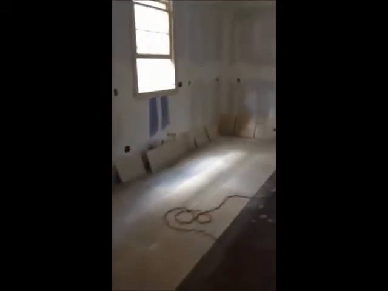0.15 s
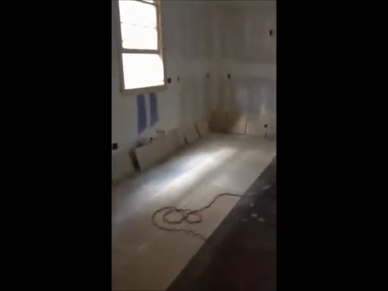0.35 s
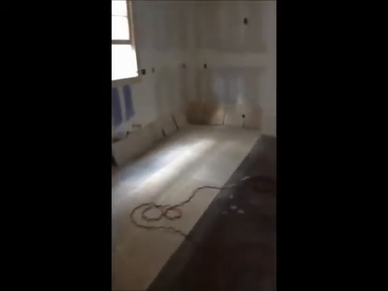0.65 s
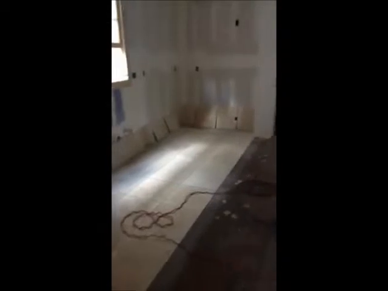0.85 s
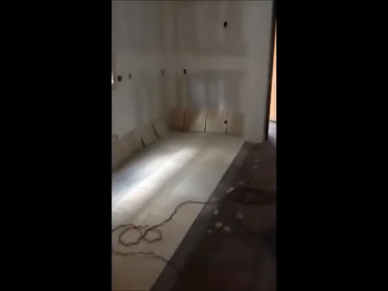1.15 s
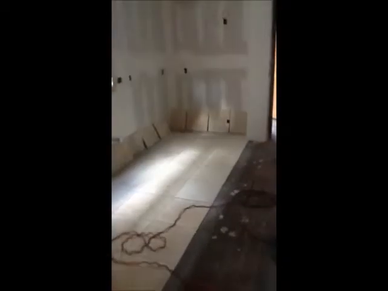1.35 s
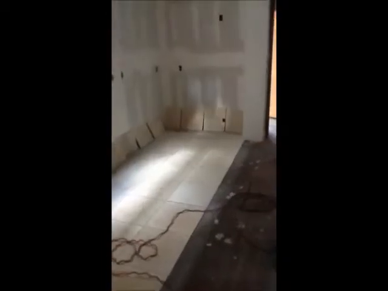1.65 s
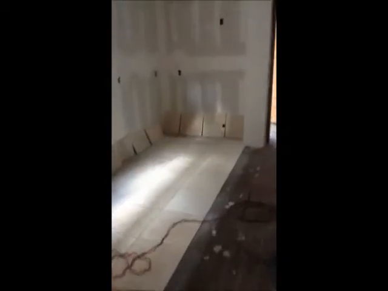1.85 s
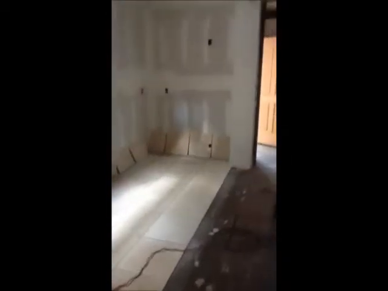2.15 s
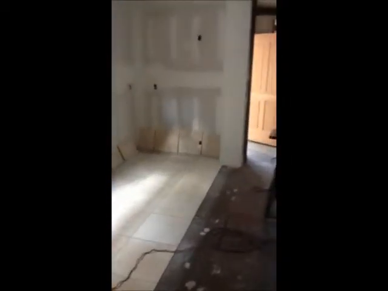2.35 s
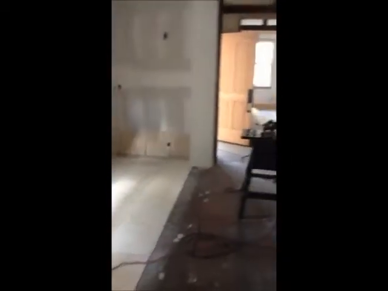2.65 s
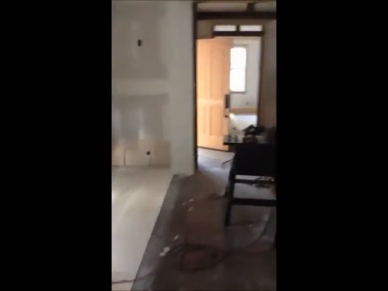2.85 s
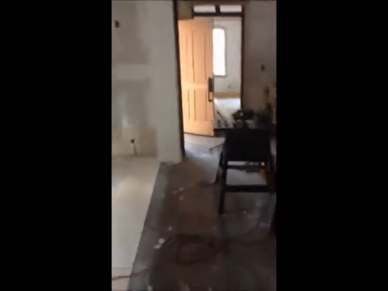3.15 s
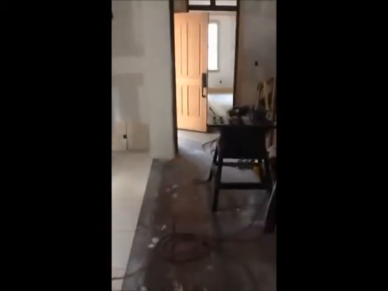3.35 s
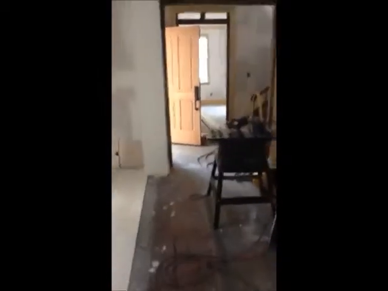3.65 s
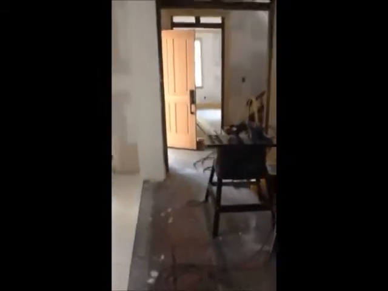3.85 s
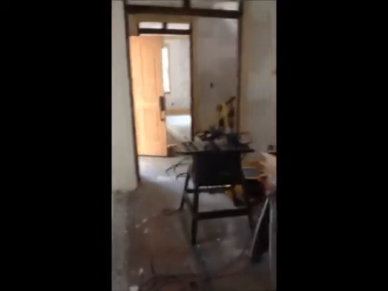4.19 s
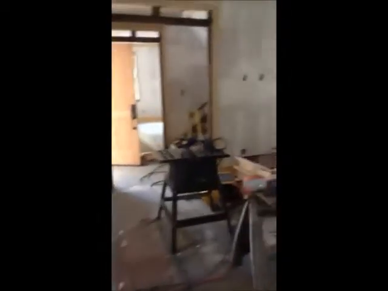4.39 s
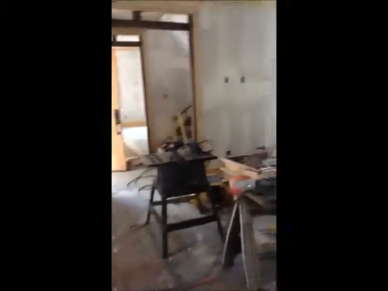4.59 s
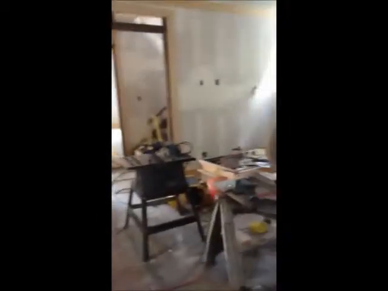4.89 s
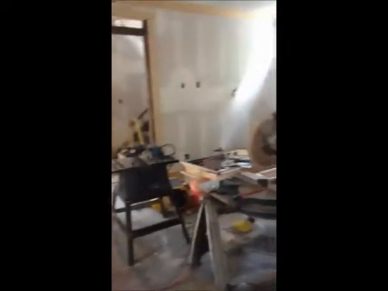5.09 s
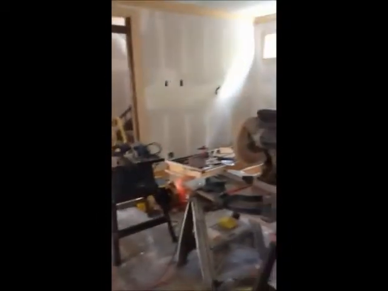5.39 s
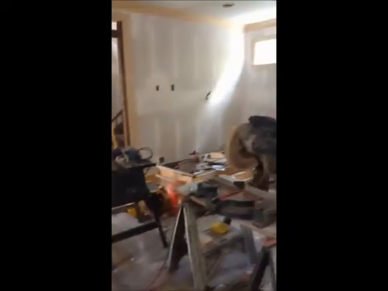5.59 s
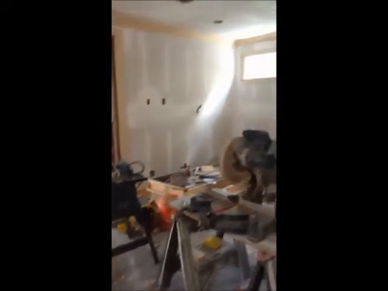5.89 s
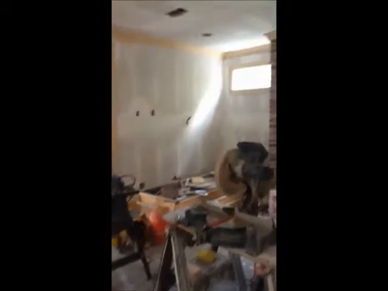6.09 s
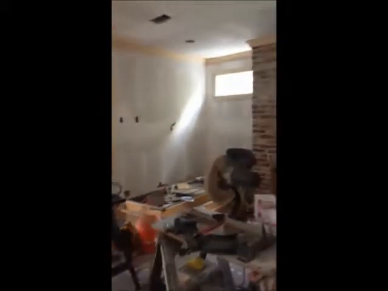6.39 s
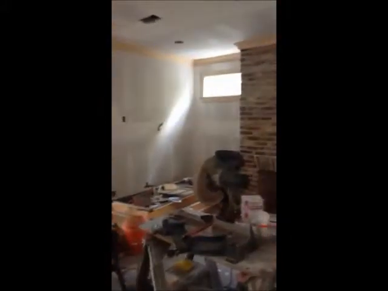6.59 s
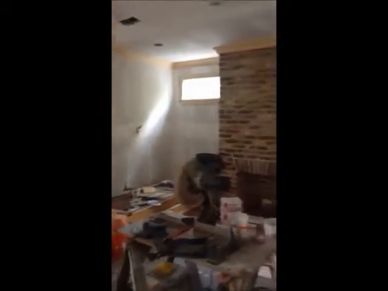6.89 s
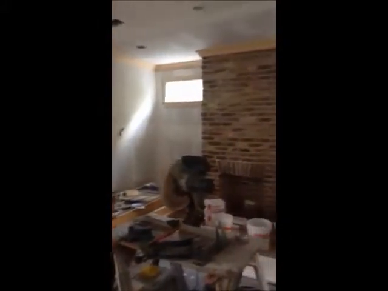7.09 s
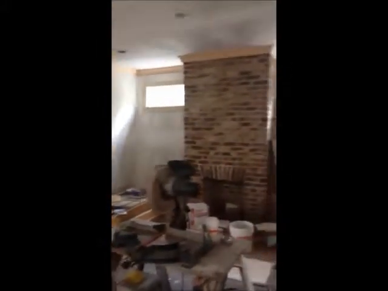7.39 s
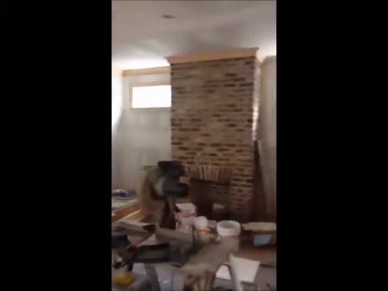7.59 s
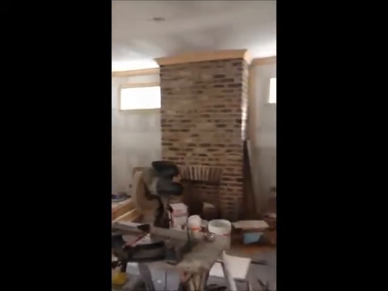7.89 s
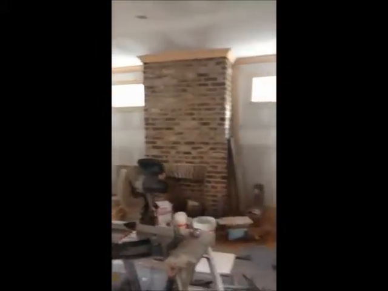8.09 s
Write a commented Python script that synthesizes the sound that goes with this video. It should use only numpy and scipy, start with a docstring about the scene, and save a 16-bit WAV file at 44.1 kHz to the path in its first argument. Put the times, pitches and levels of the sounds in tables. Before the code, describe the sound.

A saw blade hisses down to a stop while heavy hammer blows hit timber, then a nail gun cracks and boards creak and scrape in a bare room.

```python
"""Hammer and saw in a bare room

A saw blade coasts down: fading filtered noise and blade resonances, with two thin squeaks of rubbing.
Heavy blows and lighter knocks shake timber (noise bursts) and ring boards (sines); some rumble the joists.
A nail gun cracks once in three noise bursts; steel rings as decaying sines and nails as narrow resonances.
Random slips creak a board, and noise strokes scrape a gritty floor. Low house noise and echoes lie behind."""
import sys
import numpy as np
from scipy import signal
from scipy.fft import rfft, irfft, next_fast_len
from scipy.io import wavfile
from scipy.ndimage import map_coordinates

SR = 44100
rng = np.random.default_rng(int(sys.argv[2]) if len(sys.argv) > 2 else 0)


def dump(signal):
    """Clip the signal to [-1, 1] and save it as 16-bit WAV at the path in sys.argv[1]."""
    limited = np.clip(np.atleast_2d(signal).T, -1, 1)
    pcm = np.round(limited * 32767).astype(np.int16)
    wavfile.write(sys.argv[1], SR, pcm)


N = 363384
T = np.arange(SR) / SR  # seconds within one event, which lasts at most 1 s


def amp(db):
    """Decibels to gain."""
    return 10 ** (np.asarray(db) / 20)


def unit(x):
    """Scale to rms 1."""
    return x / np.sqrt(np.mean(x ** 2) + 1e-20)


def unit_onset(x):
    """Scale to rms 1 over the first 50 ms."""
    return x / np.sqrt(np.mean(x[:SR // 20] ** 2) + 1e-20)


def along(points, hz):
    """Read (pitch_hz, value) points on a log frequency axis."""
    point_hz, value = np.transpose(points)
    return np.interp(np.log(hz + 1), np.log(point_hz + 1), value)


def wobble(rate, size=N):
    """A smooth random curve with this many knots a second."""
    knots = rng.standard_normal(int(size * rate / SR) + 4)
    return map_coordinates(knots, [np.arange(size) * rate / SR])


def filtered(x, response):
    """Multiply the spectrum of x by a response of frequency."""
    m = next_fast_len(len(x) + 8192)  # padding leaves room for the filter's tail
    return irfft(rfft(x, m) * response(np.fft.rfftfreq(m, 1 / SR)), m)[:len(x)]


def coloured(x, db_of_hz, size=4096):
    """Give x this dB curve through a minimum-phase filter, so attacks stay sharp."""
    cepstrum = irfft(np.log(amp(db_of_hz(np.fft.rfftfreq(size, 1 / SR)))))
    # folding the cepstrum onto positive time makes the filter causal
    cepstrum[1:size // 2] *= 2
    cepstrum[size // 2 + 1:] = 0
    impulse = irfft(np.exp(rfft(cepstrum)))
    return signal.fftconvolve(x, impulse)[:len(x)]


def resonate(x, modes):
    """Pass x through parallel band-pass resonances (pitch_hz, width_hz, gain_db)."""
    def response(f):
        return sum(amp(db) * 1j * f * width / (hz * hz - f * f + 1j * f * width) for hz, width, db in modes)
    return filtered(x, response)


def noise(colour):
    """Steady noise of rms 1 with this spectrum."""
    return unit(filtered(rng.standard_normal(N), lambda f: amp(along(colour, f))))


def add(track, s, sound):
    """Mix a sound into the track at time s."""
    part = track[max(round(s * SR), 0):][:len(sound)]
    part += sound[:len(part)]


def hammer():
    """Heavy blows: the harder the contact, the higher its edge; far above it only splintering fibres sound."""
    # heavy blows: start_s, level_db, board pitch_hz, board ring_db, body_db, contact edge_hz,
    # splinter_db, rise_s, room_db
    blows = [(0.385, -11.5, 277, -11.5, 2.5, 4830, -5, 0.0041, 4),
             (0.851, -11.5, 271, -6.5, 1.5, 6860, -0.5, 0.0063, 1.5),
             (1.388, -12.5, 390.4, 0, -5.5, 1380, -21.5, 0.00015, 1),
             (1.511, -14.5, 371, -5, -3.5, 1420, -19.5, 0.00065, 6.5),
             (2.081, -21, 386, -1.5, -6, 1900, -23.5, 0.0019, 5),
             (2.094, -17, 340, 2.5, -6, 1334, -35, 0.0044, 4),
             (2.229, -13, 322, -10, -4.5, 2760, -22, .0012, 2),
             (5.223, -24, 206, -6.5, 0, 4100, -4, .003, 3)]
    out = np.zeros(N)
    for s, db, pitch_hz, ring_db, body_db, edge_hz, splinter_db, rise, room_db in blows:
        contact = [(280, body_db),  # the timber's body
                   (0.81 * edge_hz, -0.5),  # just under the edge
                   (edge_hz, -5),
                   (1.41 * edge_hz, 0.66 * splinter_db),  # two thirds of the splinter level in dB
                   (3.5 * edge_hz, splinter_db)]
        add(out, s, amp(db) * struck_wood(contact, pitch_hz, ring_db, rise, room_db))
    return out


def knocks():
    """Boards bump and settle; soft bumps lack treble and swell, gritty ones start sharply with a tick."""
    # lighter knocks of wood on wood: start_s, level_db, board pitch_hz,
    # treble_db (relative to the bass), tick_db (relative to the treble)
    bumps = [(0.002, -43.5, 329, 2, -7.5), (0.837, -34.5, 270, -1.5, 16.5), (1.690, -26.5, 305.6, -15.5, 0),
             (1.785, -31.5, 355, -12.5, -15.5), (2.624, -29.5, 383.6, -14, -21),
             (3.152, -30.5, 226, -7.5, 9), (3.268, -27, 202, -7, -11.5), (3.619, -41, 341, -27, -13),
             (3.655, -45.5, 271, -31, -10), (4.491, -49, 211, -29, 27), (4.556, -52.5, 181, -16, 16),
             (5.365, -32, 423, -13, 5), (5.783, -36.5, 353, -5, 4), (5.966, -40, 463, -3.5, 4),
             (6.049, -37.5, 207, -6, -3), (6.944, -46, 280, -4.5, 5), (7.300, -51, 234, -25, -4),
             (7.507, -41.5, 232, -3.5, -3), (7.555, -44.5, 561, 0, -6)]
    bass_hz, treble_hz, tick_hz = 290.5, 1100, 7000
    out = np.zeros(N)
    for s, db, pitch_hz, treble_db, tick_db in bumps:
        contact = [(bass_hz, 0), (treble_hz, treble_db), (tick_hz, treble_db + tick_db)]
        rise = 0.0065 * np.exp(-0.36 * tick_db)  # seconds; a stronger tick rises faster
        add(out, s, amp(db) * struck_wood(contact, pitch_hz, ring_db=-4.5, rise=rise, room_db=4.5))
    return out


def struck_wood(contact, pitch_hz, ring_db, rise, room_db):
    """One contact, coloured by (pitch_hz, gain_db) points: it shakes the timber, rings one board and clicks."""
    # spectrum of struck timber: pitch_hz, density_db per Hz
    timber = [(30, -41), (80, -36.5), (130, -17.5), (220, -1.5), (320, 0), (560, -2), (1100, -6.5),
              (1600, -9.5), (2700, -15.5), (4500, -23.5), (8000, -33), (15000, -44)]
    attack = 1 - np.exp(-T / max(rise, 1e-4))
    burst = rng.standard_normal(SR) * attack * amp(-60 * T / 0.1)
    shake = with_echo(burst, room_db)
    push = np.linalg.norm(burst) * np.exp(-rise / 0.0015)
    shake[0] += amp(-6.5) * push  # a fast blow lands as one push
    knock = unit_onset(coloured(shake, lambda f: along(timber, f) + along(contact, f)))

    board = np.sin(2 * np.pi * pitch_hz * T) * attack * amp(-60 * T / 0.083)
    board = coloured(board, lambda f: along([(40, -19.0), (180, 11)], f))  # a board radiates little bass
    ring = unit_onset(in_room(board, room_db - 4.5))

    touch = rng.standard_normal(SR) * attack * amp(-60 * T / 0.005)  # the click of first touch
    click_colour = [(60, -32.0), (200, -13.5), (1000, 9.5), (3400, 7), (6000, -74.0)]  # pitch_hz, gain_db
    click = amp(-3.0) * coloured(touch, lambda f: along(click_colour, f))
    return unit_onset(knock + amp(ring_db) * ring + click)


def nail_gun():
    """Quick hard contacts and a puff of air light up the whole room."""
    # driver and recoil contacts: start_s, relative level_db
    contacts = [(3.2246, -18.5), (3.2268, -18.5), (3.2291, -16)]
    # spectrum of the crack: pitch_hz, density_db per Hz
    crack_colour = [(50, -75), (120, -9), (230, -12), (570, -6.5), (950, -0.5), (1600, -7), (2500, -7),
                    (4000, -6.5), (5500, -10), (7700, -4), (12000, -9.5), (15300, -13.5)]
    shot, out = np.zeros(SR), np.zeros(N)
    start = contacts[0][0]
    for s, db in contacts:
        snap = amp(-60 * T / 0.0027)
        puff = amp(-34 - 60 * T / 0.14)
        add(shot, s - start, amp(db) * rng.standard_normal(SR) * (snap + puff))
    crack = coloured(with_echo(shot, wet_db=2.5), lambda f: along(crack_colour, f))
    add(out, start, amp(-16.5) * unit_onset(crack))
    return out


def saw():
    """Air hisses past the teeth and excites the blade; friction slows it evenly, high resonances fade first."""
    # hiss of the teeth: pitch_hz, density_db per Hz
    hiss_colour = [(40, -23.5), (100, -19.5), (160, -5.5), (320, -7.5), (700, -2.5), (1170, 1),
                   (1700, -0.5), (2400, -4.5), (4060, 5.5), (7100, -9), (8000, -12), (9600, -16.5),
                   (11300, -33.5), (12200, -31), (15300, -40)]
    # blade resonances: pitch_hz, width_hz, relative level_db
    blade = [(2455, 370, 2), (3230, 380, -5.5), (4060, 59, -23.5), (5120, 80, 5), (6330, 650, 2),
             (7230, 328, -1.5), (10620, 300, -2.5), (11440, 170, -8)]
    coast_s, hiss_power = 2.83, 2.09  # time to standstill; loudness follows speed ** hiss_power
    t = np.arange(N) / SR
    speed = np.clip(1 - t / coast_s, 0, 1)
    sing = np.zeros(N)
    for hz, width, db in blade:
        mode = resonate(rng.standard_normal(N), [(hz, width, db)])
        flutter_db = 2.65 * wobble(9.86)
        fade_db = 6.8 * t * (hz / 10000) ** 2
        sing += amp(flutter_db - fade_db) * mode
    hiss = amp(-3) * noise(hiss_colour)
    return amp(-34) * speed ** hiss_power * (hiss + amp(-8.5) * unit(sing))


def squeaks():
    """The slowing blade rubs twice: a thin, very high squeak over a faint rasp."""
    # rubs: start_s, length_s, pitch_hz, level_db
    rubs = [(1.278, 0.04, 14550, -40.5), (1.491, .04, 14200, -45.5)]
    # resonances that sing along: pitch_hz, width_hz, gain_db
    side_modes = [(7130, 173, -10), (8700, 320, -15), (9940, 170, -22.5), (12300, 181, -11)]
    out = np.zeros(N)
    for s, length, pitch_hz, db in rubs:
        pressure = np.interp(T, [0, .01, length, length + .02], [0.59, 0.6, 0.34, 0])
        rub = with_echo(rng.standard_normal(SR) * pressure, wet_db=7.0)
        sing = np.zeros(SR)
        for hz, width, mode_db in [(pitch_hz, 280, 0)] + side_modes:
            narrow = resonate(rub, [(hz, width, 0)])
            sing += amp(mode_db) * resonate(narrow, [(hz, 2 * width, 0)])  # twice, for steeper skirts
        rasp = amp(-13.5) * resonate(rub, [(6700, 7000, 0)])
        add(out, s, amp(db) * unit_onset(sing + rasp))
    return out


def steel_ring():
    """Steel joins the wood: the hammer head and a loose tool ring in sine modes, nails in narrow noise."""
    # blows that ring the hammer head: start_s, gain_db
    square_hits = [(2.23, 0), (5.225, -14)]
    # steel modes of the hammer head: pitch_hz, level_db, t60_s
    hammer_head = [(3850, -50, .9), (3930, -50, .95), (5400, -54, .66), (7830, -51, .34)]
    # driven nails that sing: start_s, pitch_hz, width_hz, level_db
    nails = [(0.383, 8270, 502, -37), (0.851, 5260, 600, -36.5)]
    # clinks of the loose metal tool: start_s, level_db
    clinks = [(5.425, -50.5), (5.782, -50.5), (5.965, -56), (6.129, -54), (7.947, -72)]
    # modes of the tool: pitch_hz, relative level_db, t60_s
    tool = [(1150, 7.5, 0.3), (1560, 3, 0.58), (2720, -5, 0.71), (3050, -10, 0.31), (3610, -1, 0.48),
            (4370, -7.5, 0.45), (5130, -5, 0.39), (5540, -5, 0.46), (7980, -12, 0.36)]
    out = np.zeros(N)
    for s, db in square_hits:
        add(out, s, amp(db) * metal(hammer_head))
    for s, hz, width_hz, db in nails:
        zing = with_echo(rng.standard_normal(SR) * amp(-60 * T / 0.065), wet_db=11.0)
        add(out, s, amp(db) * unit_onset(resonate(zing, [(hz, width_hz, 0)])))
    for s, db in clinks:
        clink = metal(tool) * (1 - np.exp(-T / 0.00078))  # a very short attack
        add(out, s, amp(db) * unit_onset(clink))
    return out


def metal(modes):
    """One ring of (pitch_hz, level_db, t60_s) modes, each at a new strength and blurred by the room."""
    out = np.zeros(SR)
    for hz, db, t60 in modes:
        level_db = db + rng.normal(0, 1.9)
        blur = 1.25 * wobble(100, size=SR)  # radians
        out += amp(level_db - 60 * T / t60) * np.sin(2 * np.pi * hz * T + blur)
    return out


def scraping():
    """Strokes over the floor: a hollow drag, and grit that catches in tiny grains."""
    # scraping strokes: start_s, length_s, grit gain_db, drag gain_db
    strokes = [(2.568, 0.097, -53.5, -43), (4.135, 0.027, -53, -54), (6.264, 0.1, -45, -47),
               (6.411, .155, -47.5, -39), (6.762, 0.095, -51.5, -50), (7.026, 0.11, -53, -51.5),
               (7.254, .025, -45, -45), (7.276, .045, -38.5, -42)]
    # spectrum of the grit: pitch_hz, density_db per Hz
    grit_colour = [(60, -50), (500, -8), (2000, 8.5), (4000, 3.5), (8000, 1.5), (12000, -2), (15000, -7)]
    # spectrum of the drag: pitch_hz, density_db per Hz
    drag_colour = [(40, -45), (80, -18), (200, 1.5), (360, 5), (650, 2.5), (1100, 3), (2000, -5),
                   (3500, -7.5), (7000, -22.5)]
    # moments when the scraping edge catches: start_s, level_db
    snags = [(6.441, -51.5), (6.622, -44.5), (6.87, -51), (7.258, -48.5)]
    grit_power, drag_power = np.zeros(N), np.zeros(N)
    for s, length, grit_db, drag_db in strokes:
        add(grit_power, s, (amp(grit_db) * stroke(length, t60=0.48)) ** 2)
        add(drag_power, s, (amp(drag_db) * stroke(length, t60=0.92)) ** 2)
    grains = rng.standard_normal(N) * (rng.random(N) < 900 / SR)  # about 900 a second
    grains = unit(filtered(grains, lambda f: amp(along(grit_colour, f))))
    grit = noise(grit_colour) + amp(-5.5) * grains
    out = np.sqrt(grit_power) * amp(0.81 * wobble(60)) * grit
    out += np.sqrt(drag_power) * amp(3.5 * wobble(35)) * noise(drag_colour)
    for s, db in snags:
        catch = with_echo(rng.standard_normal(SR) * amp(-60 * T / 0.032), wet_db=4)
        add(out, s, amp(db) * unit_onset(coloured(catch, lambda f: along(grit_colour, f))))
    return out


def stroke(length, t60):
    """The envelope of one scrape: it builds while the push lasts, then dies away in the room."""
    build = 1 - np.exp(-T / 0.017)
    return build * amp(-60 * np.maximum(T - length, 0) / t60)


def creaks():
    """A loaded board slips rapidly at an uneven rate, each slip ringing its resonance."""
    # creaks and chirps: start_s, length_s, pitch_hz, gain_db (before scaling by the root of the length)
    board_slips = [(4.14, 0.077, 474, -53.5), (5.59, 0.29, 410, -54), (5.80, 0.128, 470, -44.5),
                   (5.99, .25, 508, -45), (7.251, .015, 1930, -45), (7.925, .26, 2570, -70)]
    out = np.zeros(N)
    for s, length, pitch_hz, db in board_slips:
        slips = (rng.random(SR) < 400 / SR) * rng.standard_normal(SR) * (T < length)  # about 400 a second
        board = [(pitch_hz, 130, 0)]
        creak = in_room(resonate(resonate(slips, board), board), wet_db=-6)
        add(out, s, amp(db) * unit(creak) * np.sqrt(length))
    return out


def booms():
    """Some knocks reach the joists, which rumble on as decaying low noise."""
    # shudders of the floor joists: start_s, level_db, t60_s
    shudders = [(0.172, -55, 0.45), (1.387, -32, 0.59), (5.226, -33, 1.5), (6.048, -49.5, 0.91)]
    # spectrum of the joists: pitch_hz, density_db per Hz
    joists = [(30, -24), (70, -36), (110, -5), (160, -5), (240, -4), (450, -11), (900, -24.5), (2000, -46)]
    out = np.zeros(N)
    for s, db, t60 in shudders:
        shudder = rng.standard_normal(SR) * amp(-60 * T / t60)
        add(out, s, amp(db) * unit_onset(coloured(shudder, lambda f: along(joists, f))))
    return out


def house():
    """The low air of the building: noise whose level drifts slightly."""
    # spectrum of the quiet house: pitch_hz, density_db per Hz
    floor = [(15, -69), (25, -29), (91, -22.5), (107, -6), (198, -1), (387, -5.5), (419, -4.5), (548, -5),
             (661, -8), (717, -7.5), (1100, -10), (2040, -14), (2600, -16.5), (3400, -17), (15300, -25)]
    return amp(-56.5) * amp(0.46 * wobble(3.9)) * noise(floor)


def room_tail():
    """The echo of bare walls, energy 1: noise that decays at its own rate in each band, the top fastest."""
    # decay of the room: pitch_hz, t60_s
    decay = [(100, 0.48), (300, 0.54), (900, 0.82), (2200, 0.72), (5000, 0.67), (9000, 0.45), (15000, 0.38)]
    hz, t, bands = signal.stft(rng.standard_normal(SR), SR, nperseg=256)
    fading = bands * amp(-60 * t / along(decay, hz)[:, None])
    tail = signal.istft(fading, SR, nperseg=256)[1][:SR]
    tail *= 1 - np.exp(-T / 0.005)  # reflections take a moment to gather
    return tail / np.linalg.norm(tail)


def in_room(x, wet_db):
    """A ringing sound plus its echo."""
    return x + amp(wet_db) * signal.fftconvolve(x, room_tail())[:len(x)]


def with_echo(burst, wet_db):
    """A short burst plus its echo: partly the burst's own ringing, partly diffuse scatter."""
    ringing = signal.fftconvolve(burst, room_tail())[:SR]
    scatter = np.linalg.norm(burst) * room_tail()
    return burst + amp(wet_db) * (ringing + scatter) / np.sqrt(2)


def scene():
    """All the work, heard from one spot."""
    wood = hammer() + knocks() + booms() + creaks()
    tools = nail_gun() + saw() + squeaks() + steel_ring()
    return (wood + tools + scraping() + house())[None]


def record(dry):
    """The microphone rounds off the highest peaks and keeps nothing above its band limit."""
    top_hz = 15550
    rounded = dry[0] / (1 + np.abs(dry[0]) ** 6) ** (1 / 6)
    return filtered(rounded, lambda hz: hz < top_hz)[None]


dry = scene()
out = record(dry)
dump(out)
```